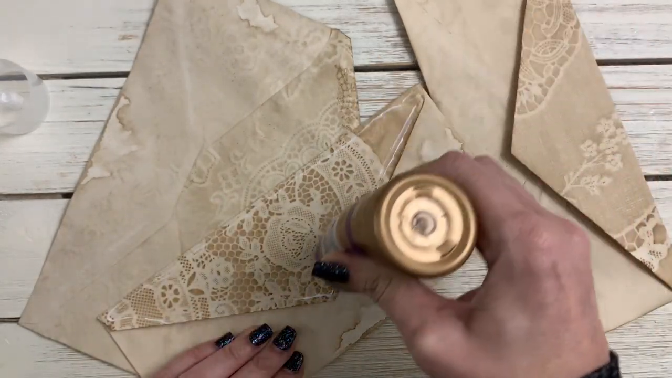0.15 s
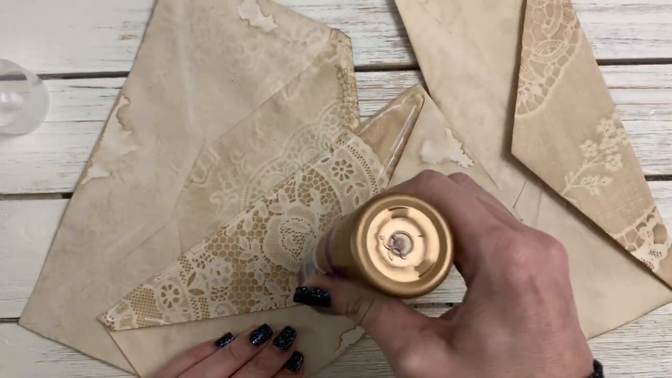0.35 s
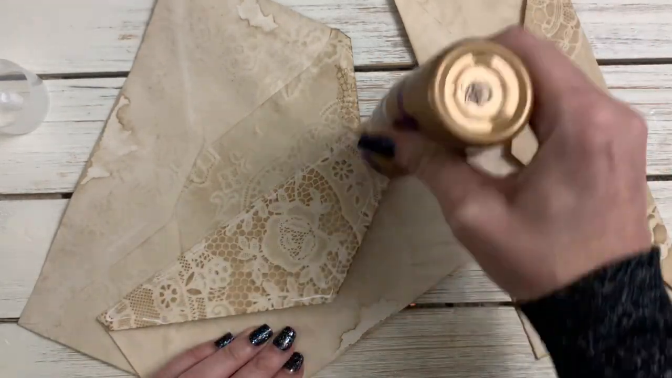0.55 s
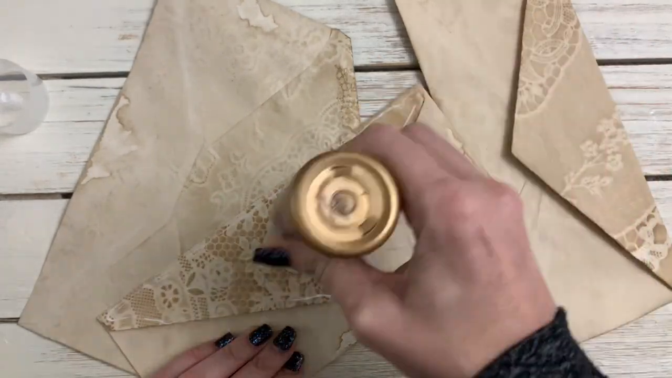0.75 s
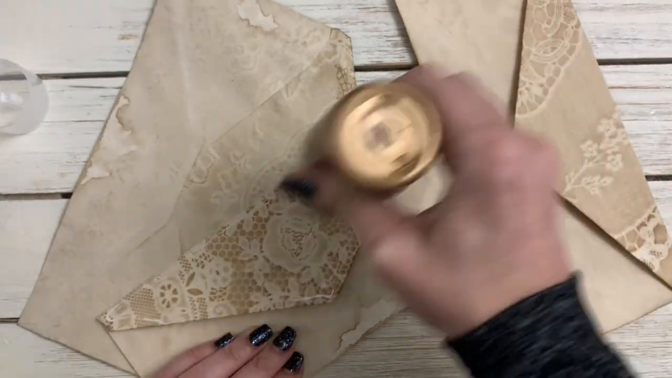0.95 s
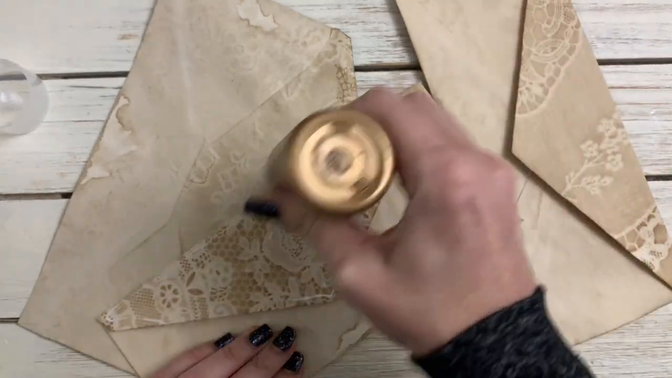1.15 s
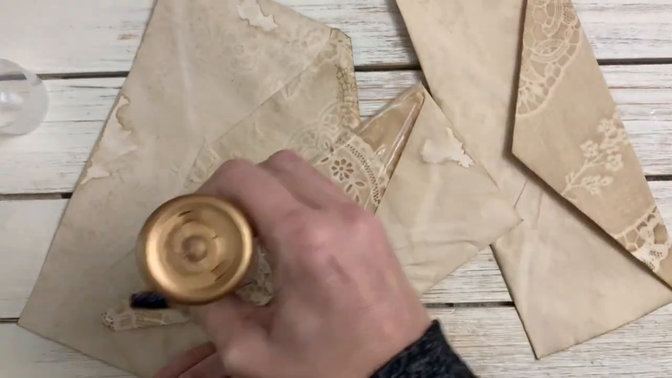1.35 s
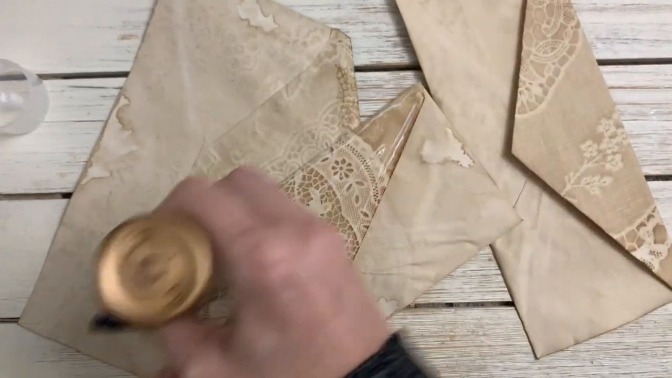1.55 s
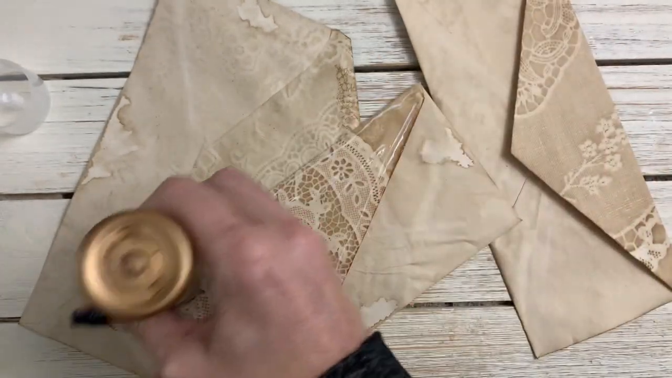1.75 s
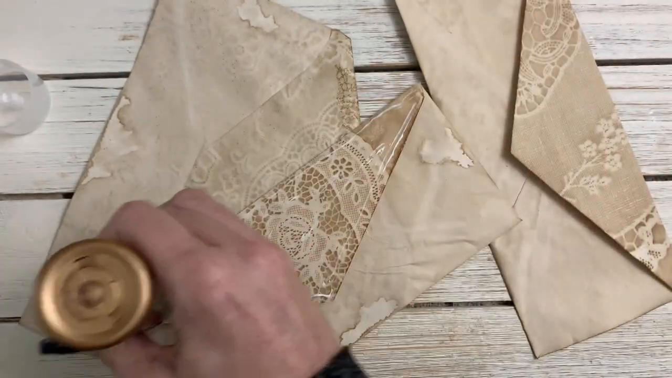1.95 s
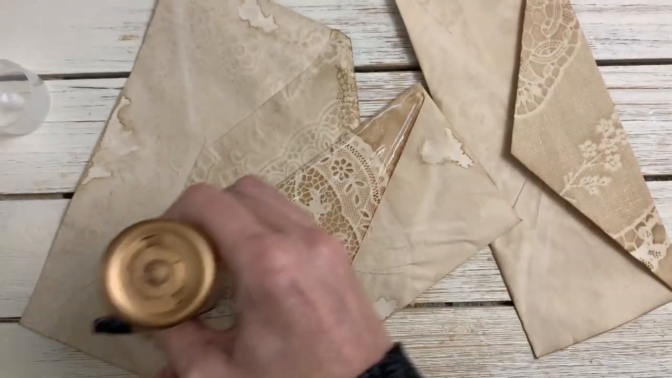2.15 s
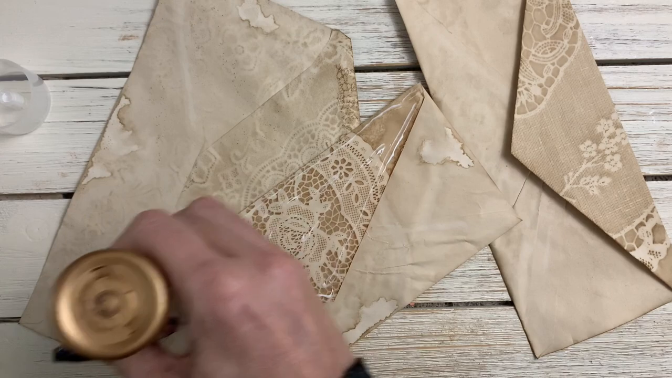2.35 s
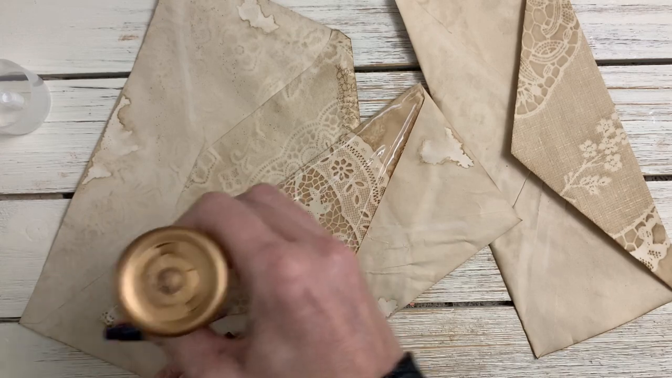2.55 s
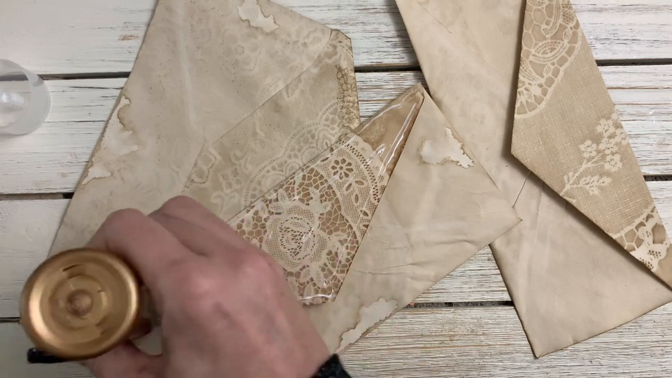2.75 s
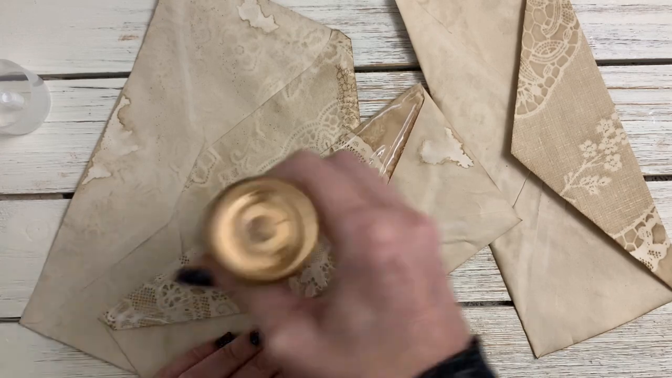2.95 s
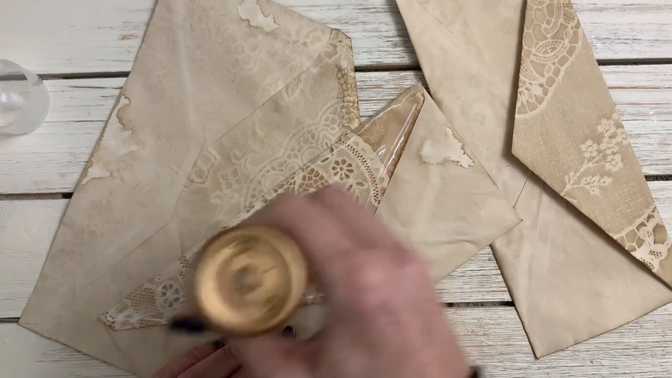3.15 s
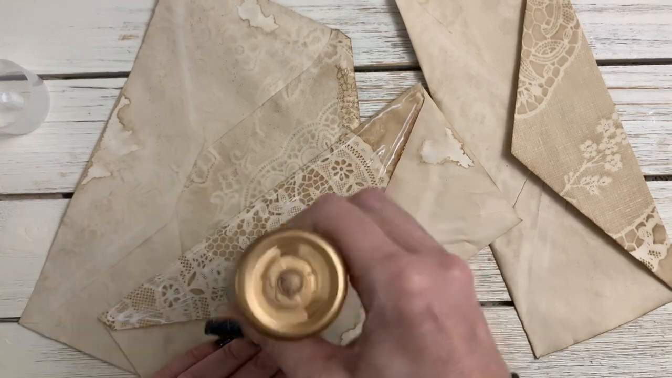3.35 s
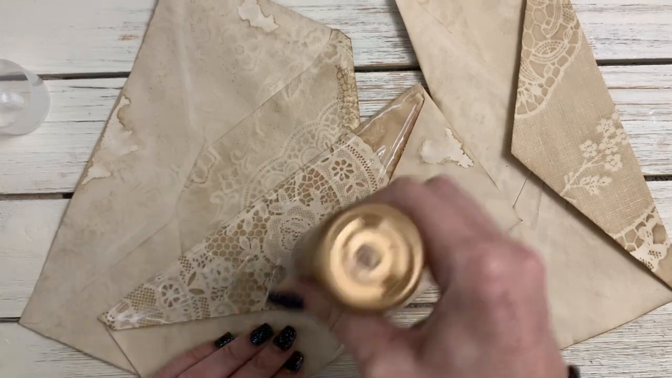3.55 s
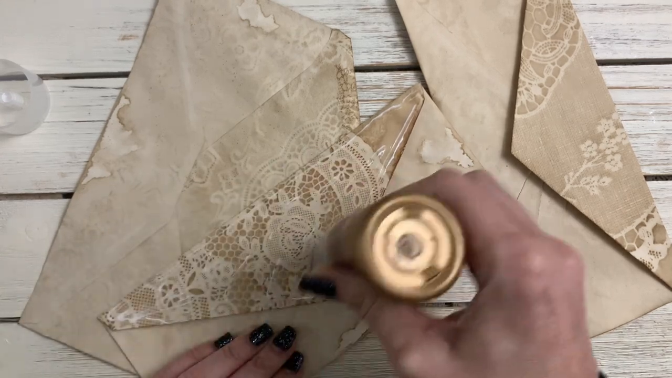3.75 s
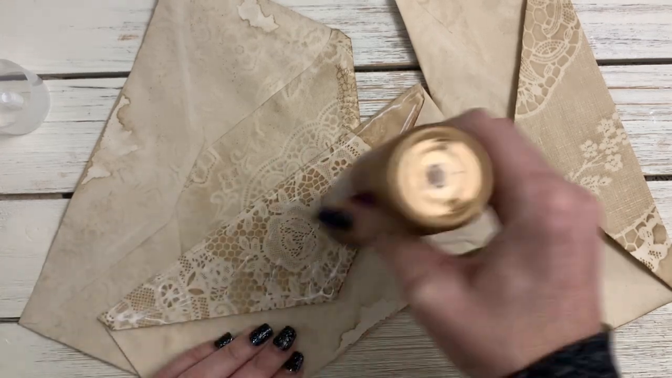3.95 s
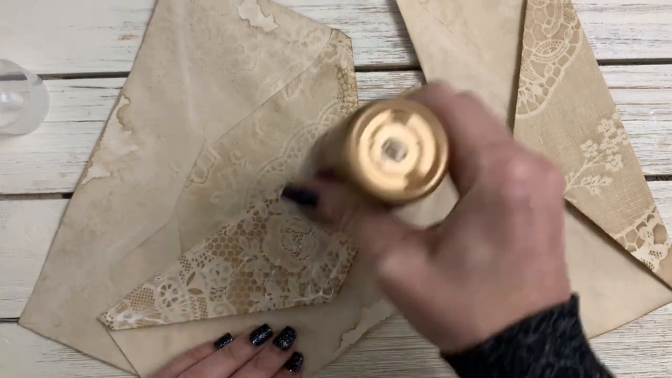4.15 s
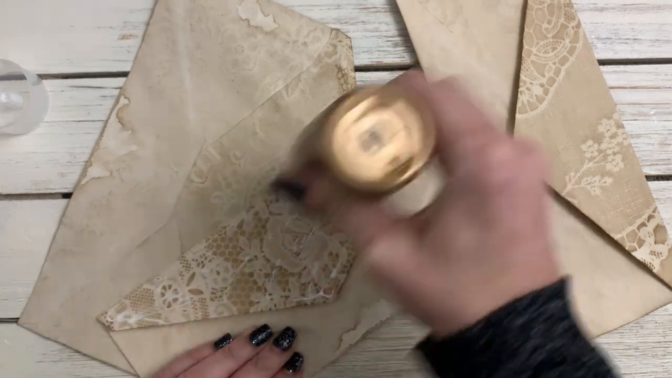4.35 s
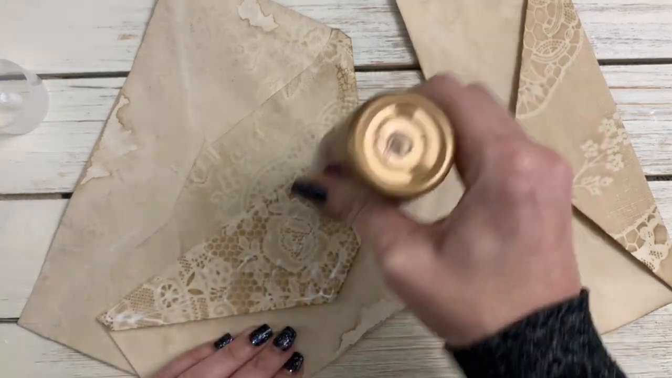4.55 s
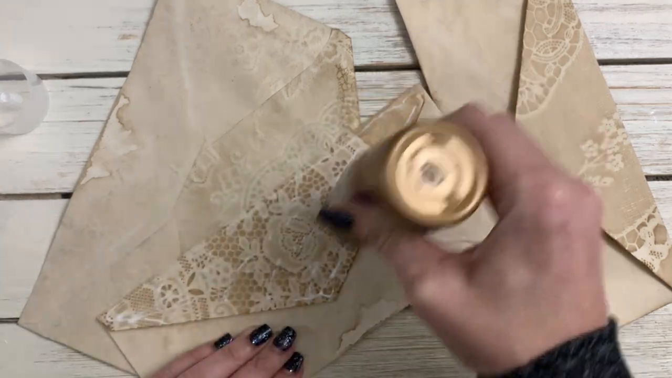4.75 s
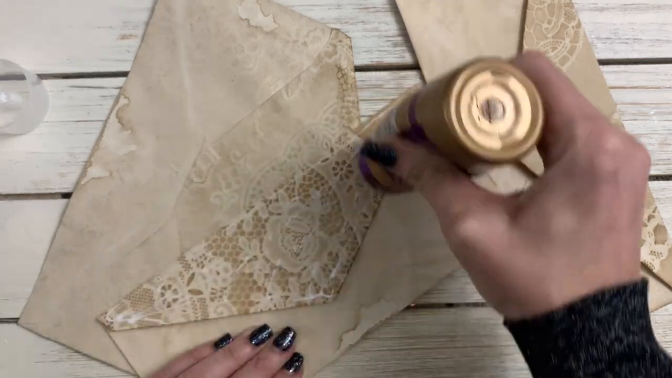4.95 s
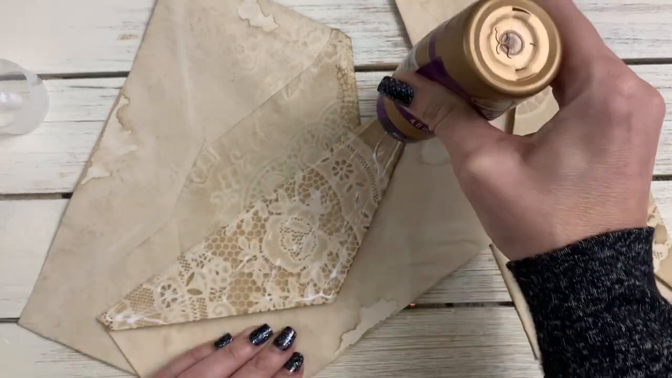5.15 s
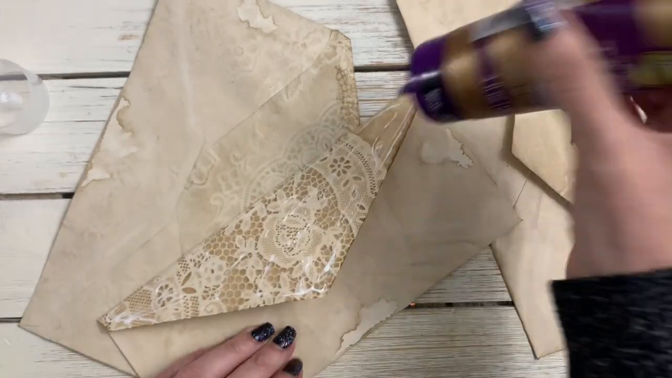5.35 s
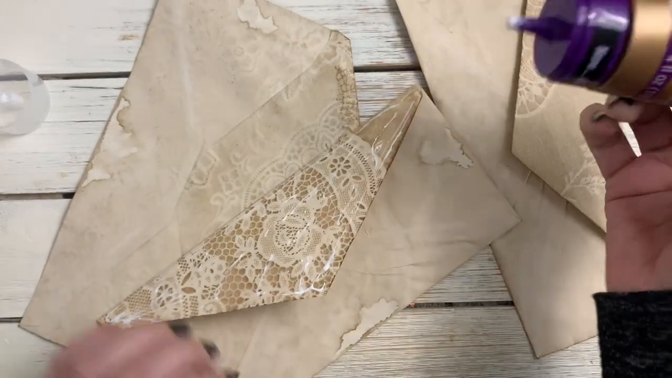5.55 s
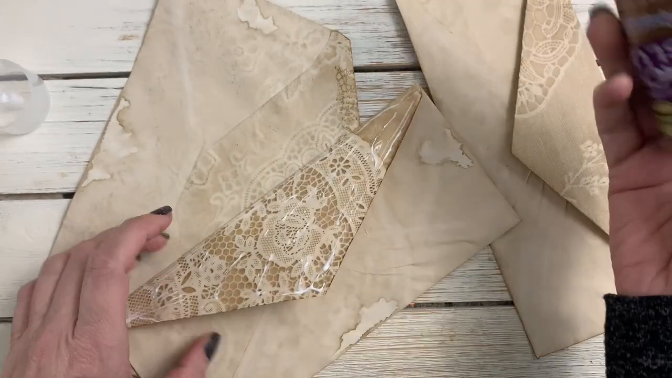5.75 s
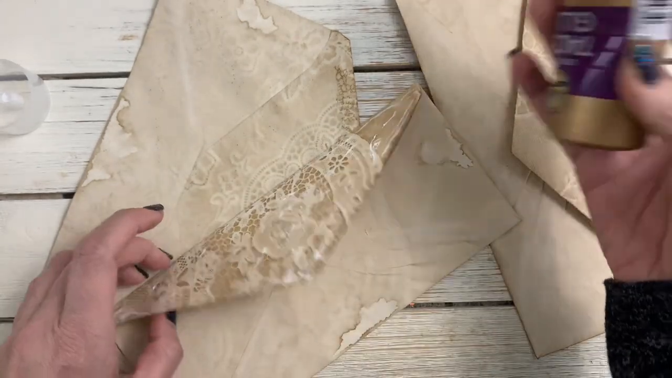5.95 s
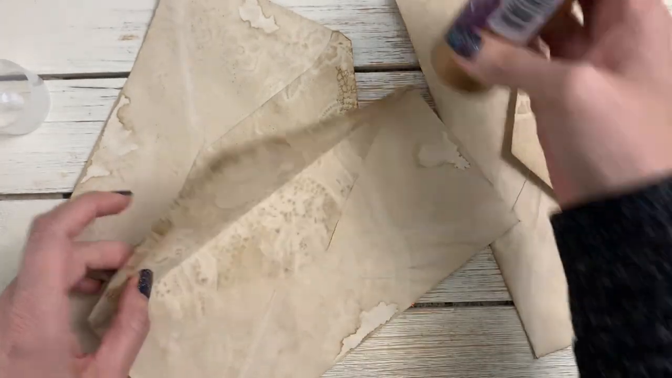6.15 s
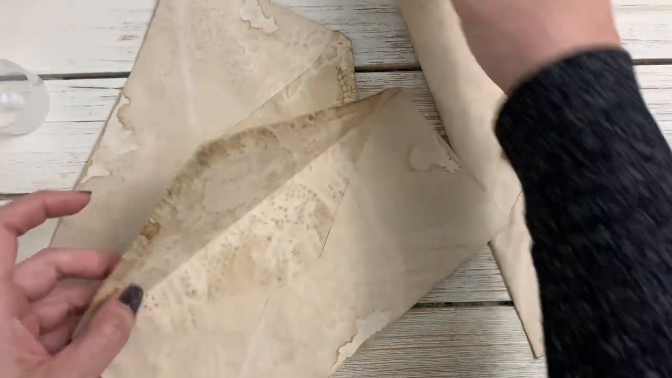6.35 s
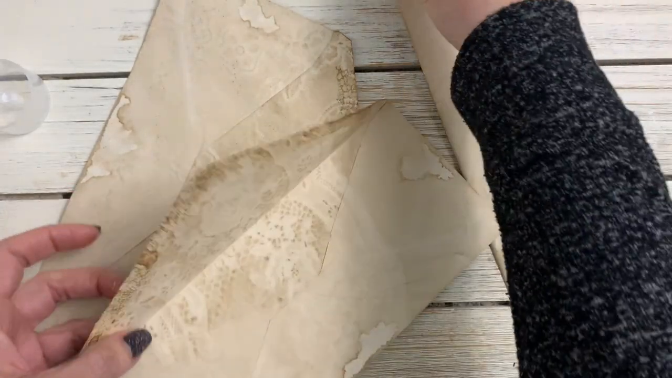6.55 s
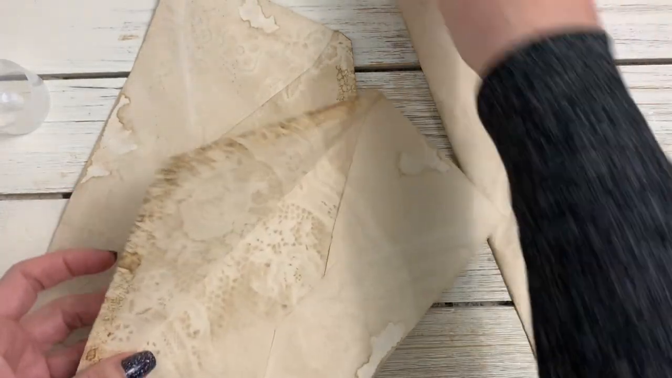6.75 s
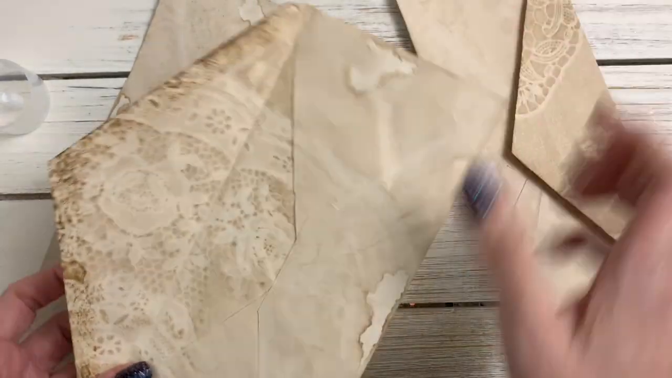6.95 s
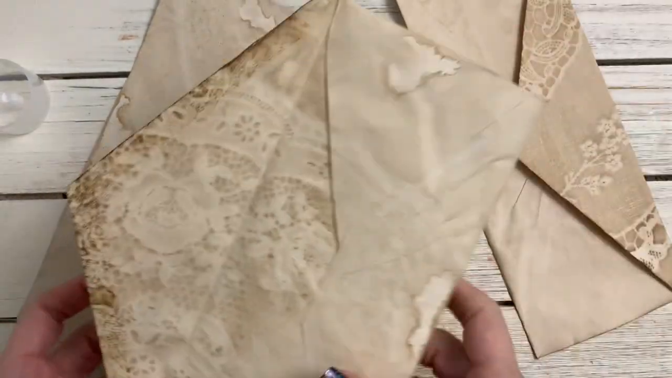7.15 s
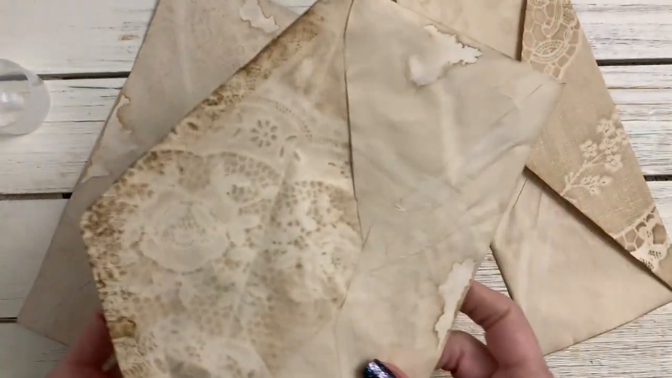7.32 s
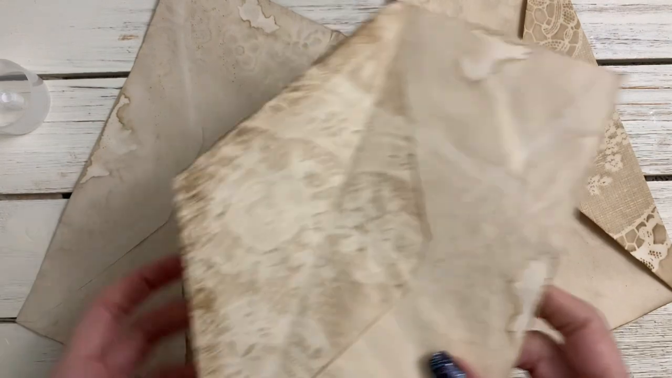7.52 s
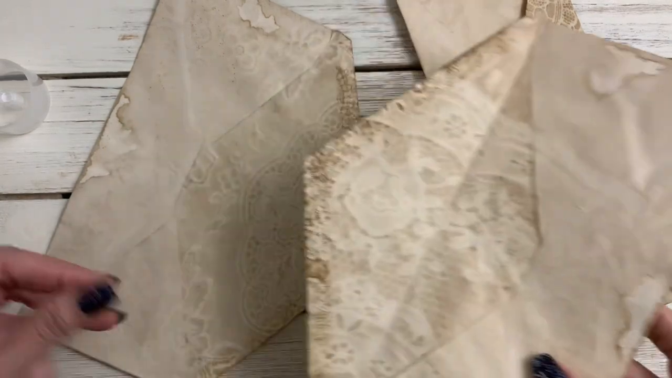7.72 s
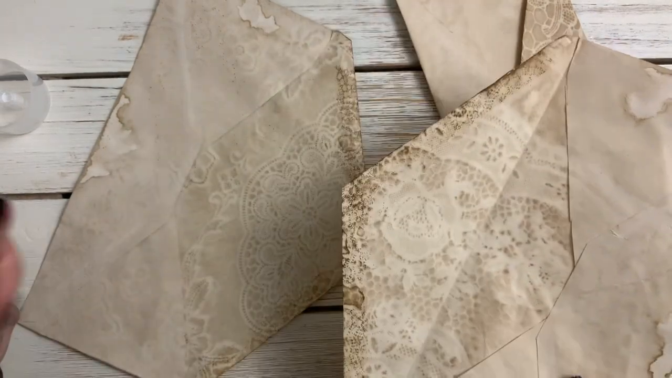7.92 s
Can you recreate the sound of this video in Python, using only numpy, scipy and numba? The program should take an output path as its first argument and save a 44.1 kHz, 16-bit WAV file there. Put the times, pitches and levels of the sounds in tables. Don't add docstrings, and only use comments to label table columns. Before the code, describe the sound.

A plastic glue-bottle tip rubs folded paper on a light wooden table in brief, uneven dry scratches, with hollow little taps and fibre clicks. One bright snap stands out near three seconds. Rubbing stops, paper slides softly, the bottle lands with a loud clattering knock and small bounce, then a sheet pops, crackles and brushes away. Close stereo phone microphone above, quiet room, faint hiss.

```python
import sys
import numpy as np
from scipy import signal
from scipy.fft import rfft, irfft
from scipy.io import wavfile
from scipy.ndimage import uniform_filter1d, map_coordinates
from numba import njit

SR = 44100
rng = np.random.default_rng(int(sys.argv[2]) if len(sys.argv) > 2 else 0)


def generate_wav(sig):
    pcm = np.round(np.clip(np.atleast_2d(sig).T, -1, 1) * 32767).astype(np.int16)
    wavfile.write(sys.argv[1], SR, pcm)


def gain_from_db(level_db):
    decades = np.asarray(level_db, float) / 20
    return 10 ** decades


N = 356328

# (frequency [Hz], spectral density [dB per Hz])
HUSH_COLOUR = [(150, 1), (250, -6.5), (484, -5.5), (1700, -18.5), (4650, -18), (5440, -23), (10400, -20),
               (11900, -23), (13200, -21.5), (15000, -24), (16000, -22.5)]
HUSH_DB = -66

# (frequency [Hz], left over right [dB])
PORT_SHADE = [(300, 0), (1000, 3), (3000, 1.5), (5200, -2.5), (7500, -2), (9000, -1)]
# (time [s], delay of the right port [samples], echo of near surfaces [dB])
HAND_PLACE = [(0, 4.8, -1), (1.1, 5.4, 1), (2.599, 5.3, 2), (3.602, 5.7, 1.5), (4.05, 5.5, 0),
              (5.101, 5, 0), (5.19, 7.75, -1), (5.4, 7.1, 3), (5.85, 7.44, -5), (6.1, 4.6, 0),
              (6.55, 5.9, 1.5), (6.95, 0.7, 2.5), (7.1, 3.94, 0.5), (7.44, 4.5, -0.5), (7.5, 0.63, 0.5),
              (7.65, 2.9, -5.5), (7.72, 13.6, -3), (8.08, 9.9, -4.5)]
MOVE_RATE_HZ, MOVE_TURNS = 9, 1.2
RUB_ECHO_DB, TICK_ECHO_DB, ECHO_FALL_S = -10, -13, 0.0015
# (time [s], share cancelled [0-1])
MIRROR_SHARE = [(0, 0), (5.17, 0), (5.2, .8), (5.45, .8), (5.55, 0), (7.66, 0), (7.72, .85), (8.08, .9)]
MIRROR_HZ, MIRROR_WIDTH_HZ = 5230.0, 850.0

# (time [s], sway [dB], sway [Hz], board [dB], board [Hz])
TABLE_BUMPS = [(0.159, -41.5, 66, -69, 119), (0.467, -57.5, 67.6, -59.5, 139), (0.745, -56, 89, -82, 156),
               (1.008, -32.5, 62.7, -38, 166), (1.472, -39, 69, -49, 123), (2.105, -45, 58, -71, 147),
               (2.522, -36, 67, -48.5, 113), (2.852, -61, 115, -73, 117.3), (4.351, -52, 44.2, -65, 134),
               (4.469, -44, 109, -47.5, 175), (4.495, -27, 59.2, -42, 181.5), (4.575, -45.5, 58, -65, 150),
               (4.772, -39.5, 61.5, -56.5, 220), (4.848, -39, 61, -48, 119), (5.127, -35, 62, -43.5, 127),
               (5.199, -46, 54.4, -52, 190), (6.507, -29.5, 114.4, -25.5, 196.4),
               (6.541, -23.5, 60.7, -32.5, 162), (7.124, -39, 60.7, -42, 121),
               (7.155, -39.5, 107, -41.5, 200), (7.214, -42, 68.2, -55, 266), (7.387, -49, 106, -45.5, 128)]
# (time [s], level [dB])
HAND_SHAKE = [(0.0, -59.5), (0.79, -60.5), (1.17, -56), (2.07, -56), (2.48, -60.5), (3.24, -58),
              (4.7, -64.5), (5.24, -47), (5.56, -58.5), (6.45, -61), (6.66, -40.5), (6.91, -58.5),
              (7.36, -48.5), (7.6, -60.5), (8.08, -62)]
# (frequency [Hz], width [Hz], level [dB])
TABLE_MODES = [(51.2, 25, 4), (111, 56.4, -0.5), (169.6, 117, -9.5), (285, 93, -10)]
STAND_SIDE_DB, STAND_LAG_S = -19, 0.003

# (time [s], crack [dB], crack [Hz], sizzle [dB])
FIBRE_SNAGS = [(0.1351, -45, 3150, -52), (0.4664, -45, 3340, -42), (.606, -34.5, 2580, -36),
               (1.04, -48, 3500, -62), (1.2795, -32, 3000, -68), (2.055, -61, 4700, -50),
               (2.328, -49, 4700, -47.5), (2.8924, -25, 4650, -37), (3.0437, -5.5, 4500, -20.5),
               (3.054, -29.5, 4780, -45), (3.061, -31, 5840, -51), (3.1722, -38, 4200, -50.5),
               (3.317, -47.5, 3500, -74), (3.3827, -41, 4170, -51.5), (3.8128, -59.5, 4500, -46.5),
               (3.822, -62, 4500, -43), (3.84, -65, 4500, -46), (3.915, -43, 4500, -42),
               (4.067, -70, 5700, -51), (4.225, -54.5, 5200, -79), (4.3097, -41, 4900, -44),
               (4.6167, -39.5, 3000, -62), (5.0507, -34, 4900, -42.5), (5.0952, -31.5, 2430, -27.5),
               (5.227, -45, 2200, -35.5), (5.2962, -43, 3400, -24.5), (5.495, -31, 2600, -39),
               (5.573, -46, 4680, -70), (5.678, -37, 3210, -62), (6.315, -55, 3000, -40),
               (6.331, -50, 3000, -55), (6.9143, -31.5, 3780, -45)]
SNAG_POP_DB, SNAG_POP_HZ = -31.5, 730
# (time [s], pop [dB], pop [Hz], crack [dB])
BOTTLE_TAPS = [(.3601, -66, 570, -54.5), (.593, -53.5, 1160, -75), (.69, -65, 1150, -80),
               (0.721, -63, 1100, -80), (0.848, -44.5, 804, -59), (0.9934, -39.5, 710, -34.5),
               (1.286, -49, 310, -70), (1.2956, -38, 872, -55), (1.47, -46.5, 322, -67.5),
               (1.4842, -40, 650, -64), (1.648, -43.5, 670, -46), (1.9815, -45.5, 730, -46),
               (2.0795, -42, 680, -75), (2.1302, -46.5, 730, -71.5), (2.5067, -42, 674, -54),
               (2.5643, -48.5, 910, -45), (3.123, -45, 746, -55.5), (3.137, -41, 755, -55.5),
               (3.605, -43, 443, -46), (4.4483, -54, 641, -37.5), (4.4698, -37.5, 480, -31.5),
               (4.55, -53, 784, -75), (4.7502, -52.5, 248, -43), (5.2063, -43, 404, -61),
               (5.32, -45.5, 730, -57)]
TAP_CRACK_HZ, TAP_SIZZLE_DB = 4500, -8.5
# (time [s], crack [dB], crack [Hz], pop [dB], pop [Hz])
BOTTLE_KNOCKS = [
    (6.4972, -15.5, 1400, -19.5, 610),
    (6.506, -11.5, 4200, -29, 233),
    (6.5084, -14.5, 6200, -23.5, 1700),
    (6.5107, -23, 1700, -29.5, 1300),
    (6.5112, -25.5, 3000, -32, 1400),
    (6.525, -13, 5500, -30, 270),
    (6.621, -15.5, 2200, -38.5, 900),
    (6.6196, -16, 4500, -48, 507),
]
KNOCK_SIZZLE_DB = -6.5
# (time [s], crack [dB], pop [dB], pop [Hz], sizzle [dB])
SHEET_BUCKLES = [(7.1116, -31, -40, 375, -30), (7.131, -27, -36, 493, -34), (7.151, -47, -30.5, 263, -61.5),
                 (7.169, -28, -33, 498, -55), (7.2141, -28, -20.5, 386, -42.5),
                 (7.246, -28, -30.5, 1090, -55), (7.307, -57, -36, 432, -71),
                 (7.387, -32.5, -35.5, 289, -54), (7.4402, -32, -37.5, 446, -44.5),
                 (7.5072, -61, -46, 960, -75), (7.7327, -47, -58, 1134, -70)]
BUCKLE_CRACK_HZ = 1400
# (time [s], crack [dB], crack [Hz], pop [dB], pop
# [Hz])
FURTHER_TICKS = [(0.9879, -38, 1970, -57, 805), (3.0444, -15, 7040, -35.5, 920),
                 (5.157, -70, 3000, -57, 1110), (5.181, -52, 4000, -77, 900), (5.193, -47, 6600, -47, 970),
                 (6.5254, -13.5, 4550, -46, 900), (6.535, -26, 5500, -52, 900),
                 (6.5137, -19, 1500, -29, 250), (6.6215, -23, 3200, -38, 1400),
                 (6.628, -38, 2500, -43, 1200), (7.1114, -31, 4500, -50, 2200),
                 (7.1305, -31, 4400, -58, 1500), (7.141, -59, 3000, -41, 1500),
                 (7.1688, -30.5, 4170, -53, 2200), (7.2149, -32, 4500, -23.5, 995),
                 (7.247, -30.5, 4000, -60, 2000), (7.3434, -50, 2670, -61, 900),
                 (7.3625, -38, 4370, -62.5, 900), (7.3662, -38, 4480, -63, 600),
                 (7.3888, -36, 2270, -32.5, 940), (7.4421, -51, 3520, -46, 1540),
                 (7.7335, -47.5, 2800, -61, 1200), (7.122, -45, 1600, -52.5, 600),
                 (7.179, -43, 2500, -42, 705), (7.226, -37, 1800, -49, 800), (7.256, -42, 1500, -49.5, 700),
                 (7.397, -44, 1600, -40, 590), (7.381, -45, 3000, -49, 300), (7.392, -43, 2590, -44, 900),
                 (7.447, -42, 1500, -46.5, 293), (1.2786, -36, 3800, -53, 1200),
                 (5.298, -42, 4500, -56, 1800)]
FURTHER_SIZZLE_DB = -20.5
POP_FALL_S, PAPER_POP_FALL_S, SIZZLE_DB = 0.006, 0.003, 7

# (frequency [Hz], width [Hz], level [dB])
TIP_MODES = [(3400, 1080, -1), (4740, 400, 3.5), (5780, 830, -9)]
BOTTLE_MODES = [(445, 170, 0.5), (730, 154, 2), (952, 140, -2)]
SHEET_MODES = [(1180, 760, 3.5), (1700, 1800, 1), (2340, 760, 2)]
FIBRE_MODES = [(7520, 2200, -1.5), (9140, 6400, -2.5), (13500, 6900, -5.5), (15330, 3400, -14.5)]
LOOSE_PAPER_MODES = [(3000, 1700, 2), (4900, 2200, 1.5), (7250, 3000, -3.5)]
FOLD_MODES = [(404, 58, 6.5), (770, 78, 1.5), (1810, 90, -7), (2200, 97, 0), (3450, 160, -1),
              (4400, 130, -11)]
PATCHINESS = (.7, 1.6, 1.2, .6, .8, .8)
CHATTER_DB, WAVER_DB = 1.15, 0.35

# (start [s], length [s], level [dB], fibre hiss over it [dB], weight on the bottle [dB])
TIP_STROKES = [(.36, 0.053, -48.5, -7.5, -4.5), (.43, 0.045, -41.5, 6.5, -21),
               (.475, 0.035, -44.5, -7, -14.5), (.578, 0.0042, -54, -7, -17.5),
               (.612, 0.0029, -43, -2.5, -12), (.645, 0.017, -66, -15, -3), (.765, 0.082, -46.5, -1, -15),
               (.845, 0.009, -58, 7.5, 5.5), (.945, 0.054, -63.5, -4, 3), (.985, 0.012, -49, -17.5, 4),
               (1.078, 0.056, -51.5, -2, -4.5), (1.145, 0.062, -62.5, -20, 0.5),
               (1.275, 0.008, -47, -17, -6.5), (2.505, 0.051, -58, -15, 5),
               (2.868, 0.0069, -49.5, -3.5, -12), (2.89, 0.034, -41.5, -7, -12),
               (3.09, 0.091, -56, -6.5, -18), (3.115, 0.035, -68.5, 4, 13), (3.15, 0.04, -47.5, -2, -29.5),
               (3.378, 0.058, -49.5, -2.5, -11), (3.6, 0.021, -50.5, -5, 1.5),
               (4.055, 0.052, -46.5, -2.5, -13), (4.31, 0.074, -44.5, -2.5, -9.5),
               (4.45, 0.038, -51.5, -6.5, 5.5), (4.578, 0.0023, -55.5, -8, -32),
               (4.62, 0.035, -51.5, -4.5, -10.5), (4.753, 0.0023, -54.5, -21.5, 2),
               (4.815, 0.0075, -53.5, -4, -4), (4.85, 0.0094, -47, -6, 2.5), (5.052, 0.049, -48, -7, -11.5)]
# (start [s], length [s], level [dB])
TIP_DABS = [(0.138, 0.015, -57), (0.246, 0.05, -68.5), (0.95, 0.0079, -58), (1.046, 0.019, -61),
            (1.178, 0.091, -63), (1.384, 0.024, -53.5), (1.449, 0.052, -58), (1.601, 0.076, -65),
            (1.74, 0.057, -58.5), (1.889, 0.038, -62), (1.968, 0.0046, -66), (2.029, 0.008, -56),
            (2.103, 0.0073, -71), (2.408, 0.045, -62), (2.997, 0.025, -64), (3.035, 0.014, -52),
            (3.647, 0.011, -68.5), (3.816, 0.005, -57), (3.884, 0.0083, -68), (4.533, 0.0088, -66),
            (4.938, 0.017, -68.5), (5.01, 0.0044, -69.5)]
DAB_HISS_DB, DAB_WEIGHT_DB = -8, -1.5
# (start [s], length [s], level [dB], fibre hiss over it [dB], weight on the bottle
# [dB])
PAPER_SLIDES = [(5.36, 0.21, -72.5, -1, 5.5), (5.65, 0.0094, -57.5, 9, -6),
                (5.73, 0.079, -48.5, -3.5, -9.5), (5.87, 0.042, -61, -6.5, -22),
                (6.03, 0.013, -59.5, 2, -8.5), (6.1, 0.022, -57, 0, -2), (6.17, 0.04, -54, -4, -9.5),
                (6.29, 0.04, -55, -1.5, -3.5), (6.44, .059, -58, -6, -16.5),
                (6.68, 0.011, -60, -1.5, -19.5), (6.75, 0.17, -69, -4.5, -5), (7.365, 0.011, -54, -3, -1.5)]
# (time [s], level [dB], fibre hiss over it [dB], weight [dB])
BLOW_RATTLES = [(3.04, -50, -8, -20.5), (6.487, -50.5, -18, -5), (6.497, -31, -15.5, -1.5),
                (6.508, -29, -3.5, -8), (6.524, -44, -2.5, -19.5), (6.616, -45, -9.5, -7),
                (6.913, -57.5, -9, -8.5), (7.112, -54, -4, 8), (7.131, -47, -3, 9.5), (7.17, -46.5, -9, -4),
                (7.211, -59, -17, -1), (7.244, -53.5, -26, 3.5), (7.386, -76, -23, 23),
                (7.439, -81, -4, 26)]
# (start [s], length [s], level [dB], fibre hiss over it [dB],
# weight on the bottle [dB])
SHEET_SWEEPS = [
    (5.195, 0.094, -65.5, -3, -1),
    (5.28, 0.048, -61, 8, -18),
    (7.505, 0.13, -57, 4.5, -2.5),
    (7.655, 0.05, -72.5, 18, -12),
    (7.72, 0.03, -63.5, 6, -32),
    (7.775, 0.024, -59.5, 9.5, -34.5),
    (7.82, 0.14, -66, 10.5, -34),
    (7.955, .11, -70.5, 20, -29),
]
# (start [s], length [s], level [dB])
FOLD_FLUTTERS = [
    (5.205, 0.072, -50),
    (5.3, 0.028, -51),
    (5.35, 0.083, -61),
    (7.786, 0.019, -71),
    (7.845, 0.2, -82),
]
# (share of tip [dB], share of weight [dB])
SHEET_SHARES = [
    (-28.5, -9.5),
    (-15, -5.5),
    (-2.5, -7.5),
    (-39, 8.5),
]
ATTACK_DB_S, RELEASE_DB_S = 1312, 490.5
SLIDE_ATTACK_DB_S, SLIDE_RELEASE_DB_S = 349, 301
BLOW_DB_S, RATTLE_DB_S, SWEEP_ATTACK_DB_S = 7999, 389.5, 652


def unit(x):
    return x / np.sqrt(np.mean(x ** 2))


@njit
def svf(x, hz, width):
    y, b, l = np.empty(len(x)), 0., 0.
    g, k = np.tan(np.pi * hz / SR), width / hz
    for i in range(len(x)):
        v = (b + g * (x[i] - l)) / (1 + g * (g + k))
        b, l, y[i] = 2 * v - b, l + 2 * g * v, k * v
    return y


def ring(x, modes):
    out = 0
    for k, (hz, width, db) in enumerate(modes):
        hz, wide = 1.0 * hz, 1.91 * width
        out = out + (-1) ** k * gain_from_db(db) * svf(svf(x, hz, wide), hz, wide)
    return out


def walk(rate):
    k = int(SR / rate)
    held = np.repeat(rng.standard_normal(N // k + 1), k)
    return 1.553 * uniform_filter1d(uniform_filter1d(held, k), k)[:N]


def course(table):
    s, *columns = np.transpose(table)
    return [np.interp(np.arange(N) / SR, s, c) for c in columns]


def spectrum(table, f):
    hz, db = np.transpose(table)
    return np.interp(np.log(f + 1), np.log(hz), db)


def add(out, s, sound):
    i = int(s * SR)
    out[i:i + len(sound)] += sound[:N - i]


def hush():
    colour = gain_from_db(spectrum(HUSH_COLOUR, np.fft.rfftfreq(N, 1 / SR)))
    return gain_from_db(HUSH_DB) * unit(irfft(rfft(rng.standard_normal((2, N))) * colour, N))


def ports(x, echoing):
    t = np.arange(SR // 4) / SR
    noise = rng.standard_normal((3, 2, len(t)))
    near = uniform_filter1d(np.diff(noise[:2, :, :512], prepend=0), size=4)
    near = near * np.exp(-t[:512] / ECHO_FALL_S)
    room = gain_from_db(-39.5) * noise[2] * np.exp(-t / 0.026) * (t > 0.004)

    def heard(v, response):
        return signal.fftconvolve(v[None], response, axes=1)[:, :N]

    turn = 2 * np.pi * MOVE_TURNS * walk(MOVE_RATE_HZ)
    lag, echo_db = course(HAND_PLACE)
    wet = gain_from_db(echo_db)
    echoing = echoing * wet
    direct = np.array([x, map_coordinates(x, [np.arange(N) - lag], order=5)])
    echoes = heard(echoing * np.cos(turn), near[0]) + heard(echoing * np.sin(turn), near[1])
    return direct + heard(x * wet, room) + echoes


def mirror(rub):
    return rub - course(MIRROR_SHARE)[0] * svf(rub, MIRROR_HZ, MIRROR_WIDTH_HZ)


def table():
    out, t = np.zeros(N), np.arange(SR // 2) / SR
    for s, sway_db, sway_hz, board_db, board_hz in TABLE_BUMPS:
        swell = 1.12 * (1 - np.exp(-t / 0.013)) ** 2 * np.exp(-t / 0.069 - (t / 0.054) ** 2)
        sway = swell * np.sin(2 * np.pi * sway_hz * t)
        decay = (1 - np.exp(-t / 0.00068)) * np.exp(-t / 0.016)
        board = decay * np.sin(2 * np.pi * board_hz * t)
        add(out, s - 0.008, gain_from_db(sway_db + 12.0) * sway + gain_from_db(board_db + 12.5) * board)
    push = rng.standard_normal(N) * gain_from_db(0.65 * walk(4.9))
    return out + gain_from_db(course(HAND_SHAKE)[0]) * unit(ring(push, TABLE_MODES))


def stand(bumps):
    side = gain_from_db(STAND_SIDE_DB) * np.roll(bumps, int(STAND_LAG_S * SR))
    return bumps + side * np.array([[1], [-1]])


def burst(hz, width, fall_s, noise):
    kick = noise * np.exp(-np.arange(len(noise)) / SR / fall_s)
    kick[0] = 4.2
    y = svf(svf(kick, hz, width), hz, width)
    return y / np.abs(y).max()


def ticks():
    # (time, crack dB, crack Hz, pop dB, pop Hz, sizzle dB, pop decay s)
    rows = [(s, db, hz, db + SNAG_POP_DB, SNAG_POP_HZ, top_db, POP_FALL_S)
            for s, db, hz, top_db in FIBRE_SNAGS]
    rows += [(s, db, TAP_CRACK_HZ, pop_db, hz, db + TAP_SIZZLE_DB, POP_FALL_S)
             for s, pop_db, hz, db in BOTTLE_TAPS]
    rows += [(*row, row[1] + KNOCK_SIZZLE_DB, POP_FALL_S) for row in BOTTLE_KNOCKS]
    rows += [(s, db, BUCKLE_CRACK_HZ, pop_db, hz, top_db, PAPER_POP_FALL_S)
             for s, db, pop_db, hz, top_db in SHEET_BUCKLES]
    rows += [(*row, row[1] + FURTHER_SIZZLE_DB, PAPER_POP_FALL_S) for row in FURTHER_TICKS]
    out = np.zeros(N)
    noise = rng.standard_normal((len(rows), 3, 2048))
    for (s, crack_db, crack_hz, pop_db, pop_hz, sizzle_db, fall_s), chance in zip(rows, noise):
        crack = burst(1.0 * crack_hz, 0.6 * crack_hz, 0.002, chance[0])
        pop = burst(1.0 * pop_hz, 0.54 * pop_hz, fall_s, 0.45 * chance[1])
        sizzle = burst(11000.0, 11000.0, 0.00079, chance[2])
        add(out, s, gain_from_db(crack_db) * crack)
        add(out, s, gain_from_db(pop_db + 6.0) * pop)
        add(out, s, gain_from_db(sizzle_db + SIZZLE_DB) * sizzle)
    return out


def contact(rows, attack_db_s, release_db_s):
    t, out = np.arange(N) / SR, np.zeros((3, N))
    for s, length, db, hiss_db, weight_db in rows:
        a, b = max(int((s - 0.2) * SR), 0), int((s + length + 0.32) * SR)
        before = np.maximum(s - t[a:b], 0)
        after = np.maximum(t[a:b] - s - length, 0)
        shape = -attack_db_s * before - release_db_s * after
        out[:, a:b] += gain_from_db(db + shape + np.array([[0], [weight_db], [hiss_db]]))
    return out


def touches():
    dabs = [(s, length, db, DAB_HISS_DB, DAB_WEIGHT_DB) for s, length, db in TIP_DABS]
    rattles = [(s, 0, *levels) for s, *levels in BLOW_RATTLES]
    flutters = [(*row, 0, 0) for row in FOLD_FLUTTERS]
    kinds = (contact(TIP_STROKES + dabs, ATTACK_DB_S, RELEASE_DB_S),
             contact(PAPER_SLIDES, SLIDE_ATTACK_DB_S, SLIDE_RELEASE_DB_S),
             contact(rattles, BLOW_DB_S, RATTLE_DB_S),
             contact(SHEET_SWEEPS, SWEEP_ATTACK_DB_S, RELEASE_DB_S))
    sheet = 0
    for (tip, weight, _), (tip_db, weight_db) in zip(kinds, SHEET_SHARES):
        sheet = sheet + gain_from_db(tip_db) * tip + gain_from_db(weight_db) * weight
    _, weight, hiss = sum(kinds)
    loose = sum(kind[0] for kind in kinds[1:])
    fold = contact(flutters, ATTACK_DB_S, RELEASE_DB_S)[0]
    return kinds[0][0], weight, sheet, hiss, loose, fold


def slips(rate, spread_db):
    released = rng.random(N) < rate / SR
    return released * rng.standard_normal(N) * gain_from_db(spread_db * rng.exponential(size=N))


def scrape():
    chatter = CHATTER_DB * walk(250) + WAVER_DB * walk(40)
    bodies = (TIP_MODES, BOTTLE_MODES, SHEET_MODES, FIBRE_MODES, LOOSE_PAPER_MODES, FOLD_MODES)
    slips_per_s = (8980, 1500, 4000, 20000, 10700, 4000)
    out = 0
    for gain, modes, rate, patchy_db in zip(touches(), bodies, slips_per_s, PATCHINESS):
        kicks = slips(rate, spread_db=0.5) * gain_from_db(chatter + patchy_db * walk(30))
        out = out + gain * unit(ring(kicks, modes))
    return out


def scene():
    bumps, rub, tick = table(), mirror(scrape()), ticks()
    echoing = gain_from_db(RUB_ECHO_DB) * rub + gain_from_db(TICK_ECHO_DB) * tick
    return ports(rub + tick, echoing) + stand(bumps) + hush()


def low_pass(x):
    return signal.sosfilt(signal.butter(12, 15900, fs=SR, output="sos"), x)


def record(dry):
    join_hz, late_samples, low_cut_hz, air_hz, air_db = 8960, 13, 33, 15850, -60
    f = np.fft.rfftfreq(N, 1 / SR)
    top = 1 / (1 + (join_hz / (f + 1)) ** 16)
    late = np.exp(-2j * np.pi * f * late_samples / SR)
    shade = gain_from_db(spectrum(PORT_SHADE, f) / 2)
    left, right = rfft(dry) * gain_from_db(air_db / (1 + (air_hz / (f + 1)) ** 200))
    right = right * (1 - top) + top * left / late
    low_cut = 1 / (1 + (low_cut_hz / (f + 1)) ** 4)
    mix = irfft(np.array([left * shade, right / shade]) * low_cut, N)
    return low_pass(mix)


dry = scene()
out = record(dry)
generate_wav(out)
```